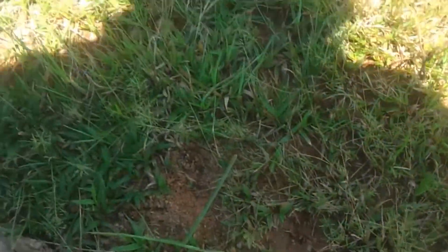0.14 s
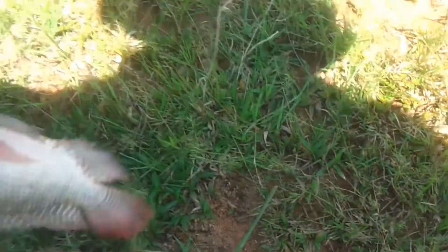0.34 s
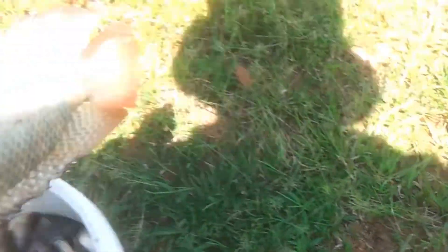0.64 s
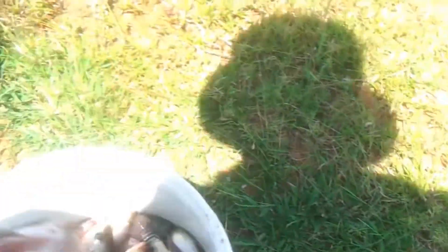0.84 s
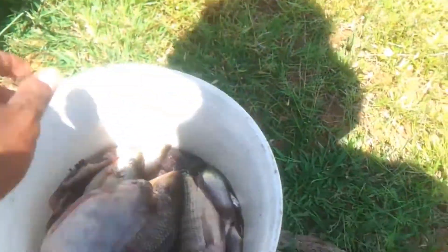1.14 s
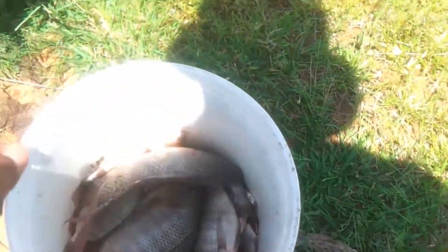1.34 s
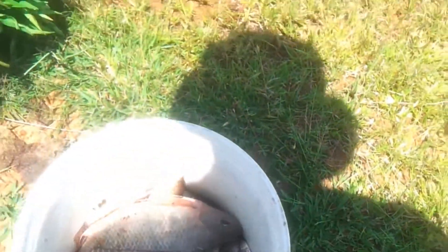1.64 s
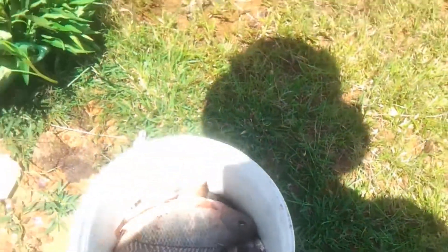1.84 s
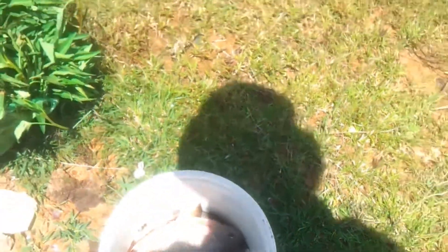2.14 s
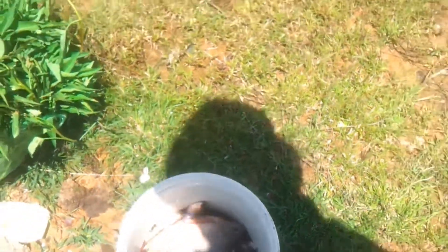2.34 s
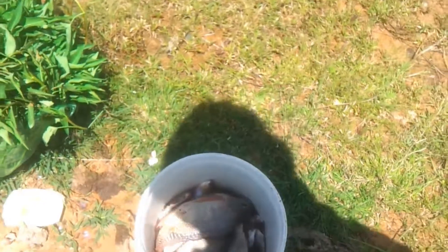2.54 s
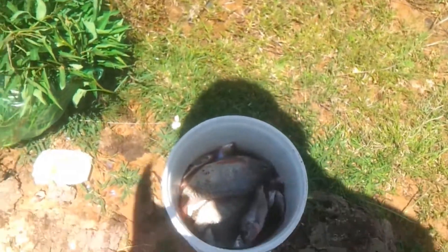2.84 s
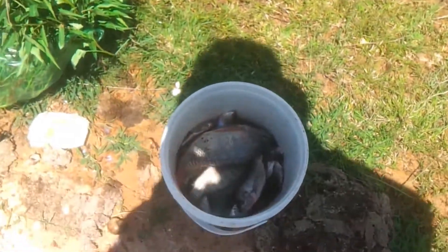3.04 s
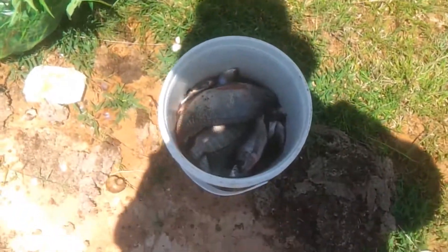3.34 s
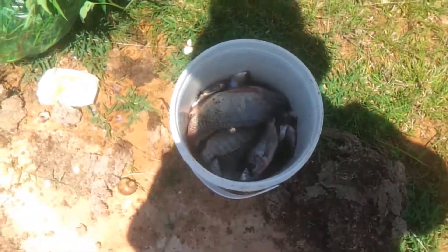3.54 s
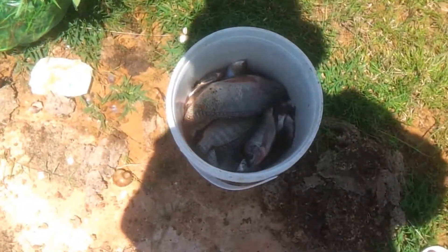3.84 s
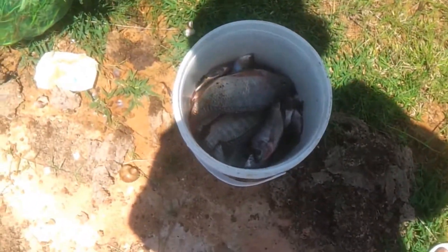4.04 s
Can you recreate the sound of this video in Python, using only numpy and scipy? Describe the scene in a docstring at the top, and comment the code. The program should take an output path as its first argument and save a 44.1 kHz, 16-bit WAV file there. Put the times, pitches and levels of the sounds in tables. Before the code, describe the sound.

Wind bumps the microphone, then a wet fish slaps loudly into a plastic bucket, flops and slides, followed by small ticks and shoes scuffing dry grass.

```python
"""A fish is dropped onto other fish in a plastic bucket, outdoors, close to the camera's microphone.
First air buffets the microphone, as eddies of pressure over coloured noise, and shoes and clothes stir.
At 0.87 s the fish slaps down, flops over and slides: noise bursts ring the bucket, splash wet, thump its floor.
Small wet ticks, filtered bursts, follow as it settles. Then the person steps back, shoes scuffing over dry
grass and soil (crowds of tiny grains), with a dull rumble as the camera is carried, in quiet air and hiss."""
import sys
import numpy as np
from scipy import signal
from scipy.fft import rfft, irfft
from scipy.io import wavfile
from scipy.ndimage import uniform_filter1d

SR = 44100
rng = np.random.default_rng(int(sys.argv[2]) if len(sys.argv) > 2 else 0)


def pcm_store(signal):
    """Save signal as 16-bit PCM."""
    levels = np.round(np.clip(np.atleast_2d(signal), -1, 1) * 32767)
    wavfile.write(sys.argv[1], SR, levels.astype(np.int16).T)


N = 184911  # length in samples

# gusts of air at the microphone: (start t/s, length/s, level at the start/dB before the churn's own gain,
# growth/dB per s)
GUST_ROWS = [(0.029, 0.089, -34, 0), (0.136, .11, -32, -30), (0.493, 0.037, -27, -60),
             (0.569, 0.126, -29.5, 58), (2.956, 0.058, -36.5, -1.5)]


def amp(db):
    """Decibels to gain."""
    return 10 ** (np.asarray(db) / 20)


def unit(x):
    """Scales to rms 1."""
    return x / np.sqrt(np.mean(x ** 2) + 1e-20)


def add(mix, s, sound):
    """Mixes a sound in at time s, in seconds."""
    part = mix[max(round(s * SR), 0):][:len(sound)]
    part += sound[:len(part)]


def gain_at(f, points):
    """Gain at the frequencies f, from (f/Hz, level/dB) points joined along log frequency."""
    hz, db = np.transpose(points)
    return amp(np.interp(np.log(f + 1), np.log(hz), db))


def colour(x, points):
    """Filters by a spectrum of (f/Hz, level/dB) points, with no phase shift."""
    f = np.fft.rfftfreq(len(x), 1 / SR)
    return irfft(rfft(x) * gain_at(f, points), len(x))


def causal(x, points, size=2048):
    """The same colour with minimum phase, so that nothing sounds before a blow."""
    f = abs(np.fft.fftfreq(size, 1 / SR))
    log_gain = np.log(gain_at(f, points))
    taps = np.fft.ifft(np.exp(np.conj(signal.hilbert(log_gain)))).real
    return signal.fftconvolve(x, taps[:size // 2])[:len(x)]


def drift(rate):
    """Slow random motion of rms 1, with about this many turns a second."""
    f = np.fft.rfftfreq(N, 1 / SR)
    return unit(irfft(rfft(rng.standard_normal(N)) * np.exp(-(f / rate) ** 2), N))


def scatter(start, length, gap, jitter=.8, count=64):
    """Unevenly spaced moments in seconds, one somewhere within each gap."""
    s = np.arange(start, start + length, gap)
    return s + jitter * gap * rng.random(count)[:len(s)]


def contact(t60, size=8192, count=4):
    """The noise of a contact: a dying burst that holds all frequencies about equally."""
    fade = amp(-60 * np.arange(size) / SR / t60)
    x = rng.standard_normal(size) * fade
    for _ in range(count):  # even out the spectrum, then hold it under the fade
        flat = irfft(np.exp(1j * np.angle(rfft(x))))
        x = unit(flat) * np.sqrt(np.mean(fade ** 2))
        x = np.clip(x, -3 * fade, 3 * fade)
    return x


def at_level(x, db, t60):
    """Gives x the energy of a sound that starts at db and dies by 60 dB in t60."""
    return amp(db) * x / np.linalg.norm(x) * np.sqrt(t60 * SR / np.log(1e6))


def fish(blows, wall_db=-25, wall_t60=.06, spot_db=2.0, detune=0.009, soft_s=0.00051):
    """Each blow rings the bucket, squirts slime between the bodies and thumps the floor."""
    # resonances of the loaded plastic bucket: (f/Hz, width/Hz, level/dB before the width and blow weigh in)
    bucket = [(437, 23, -16), (630, 150, -13), (679, 70, -4.5), (1107, 116, 0), (1235, 50, 0),
              (1249, 62, -0.5), (1391, 93, -1.5), (1600, 140, -10.5), (1910, 280, -8.5), (2138, 26, -2),
              (2267, 53, -1), (2810, 100, -6), (3006, 110, 1.5), (3160, 240, -0.5), (3360, 150, -4.5),
              (3926, 520, -12.5), (4185, 170, -8.5), (4720, 270, -14), (5020, 360, -16.5), (6540, 940, -17)]
    # spectrum of the wet splash: (f/Hz, level/dB, relative)
    splash = [(200, -14), (700, 4), (2000, 4.5), (4000, 3), (6800, -0.5), (9000, -5), (12000, -14.5),
              (16000, -23.5)]
    thump_hz, thump_t60 = 460, 0.043  # the low note of the bucket's floor, and its decay in s
    t, out = np.arange(8192) / SR, np.zeros(N)

    hz, width, db = np.transpose(bucket)[:, :, None]
    sign = (-1) ** np.arange(len(hz))[:, None]
    modes = sign * amp(db) * width * np.exp(-np.pi * width * t)
    soft_start = 1 - np.exp(-t / soft_s)
    thump = np.sin(2 * np.pi * thump_hz * t) * amp(-60 * t / thump_t60) * soft_start

    for s, ring_db, splash_db, thump_db, t60, hardness in blows:
        spot, load = 2 * rng.random((2, len(hz), 1)) - 1  # every blow lands elsewhere, and the load shifts
        reach = amp(spot_db * spot + hardness * np.log2(hz))  # soft flesh misses the high modes
        tones = np.sin(2 * np.pi * hz * (1 + detune * load) * t)
        ring = (modes * reach * tones).sum(0)
        add(out, s, at_level(signal.fftconvolve(contact(t60), ring), ring_db, t60))
        add(out, s, at_level(causal(contact(t60), splash), splash_db, t60))
        add(out, s, amp(thump_db) * thump)

    walls = contact(wall_t60)  # sound bounces briefly between the bucket's walls
    return out + amp(wall_db) * signal.fftconvolve(out, walls / np.linalg.norm(walls))[:N]


def slips(uneven_db=1.0, hardness_spread_db=4.0):
    """A sliding body sticks and slips: a quick run of small blows that weaken on the whole."""
    # the body slides on after a heavy blow: (start t/s, length/s, bucket ring level/dB, wet splash level/dB),
    # both levels at the start of the slide
    slithers = [(0.888, .024, -19.5, -31), (1.031, .018, -39, -30.5), (1.068, .037, -19.5, -22.5)]
    gap_s, t60, fade_db_per_s = .007, 0.034, -330
    thump_over_ring_db = -18
    rows = []
    for start, length, ring_db, splash_db in slithers:
        moments = scatter(start, length, gap_s)
        for s, (force, hardness) in zip(moments, rng.standard_normal((64, 2))):
            db = fade_db_per_s * (s - start) + uneven_db * force
            thump_db = ring_db + db + thump_over_ring_db
            rows.append((s, ring_db + db, splash_db + db, thump_db, t60, hardness_spread_db * hardness))
    return rows


def ticks(rows, skirt_db=-13, ragged_db=5.5, scrape_db=-19, scrape_s=0.0019):
    """Short snaps, each with one ragged resonance and a tiny scrape around it."""
    out, f = np.zeros(N), np.geomspace(50, 20000, 70)
    t = np.arange(-2048, 2048) / SR
    for s, db, hz, octaves, t60 in rows:
        shape = skirt_db * np.log10(1 + (np.log2(f / hz) / octaves) ** 4)
        hump = np.column_stack([f, shape + ragged_db * rng.standard_normal(len(f))])
        add(out, s, at_level(causal(contact(t60), hump), db, t60))
        scrape = unit(colour(rng.standard_normal(len(t)), hump)) * np.exp(-abs(t) / scrape_s)
        add(out, s + t[0], amp(db + scrape_db) * scrape)  # swells just ahead of the snap
    return out


def snaps(grit):
    """Faint stalks give way under a scraping sole: ticks whose level follows the grit underfoot."""
    per_s, over_grit_db, t60 = 9, 7.5, 0.026
    middle_hz, spread_octaves, width_octaves = 2780, .7, 0.42
    moments = scatter(0, N / SR, 1 / per_s)
    grit_then = np.interp(moments, np.arange(N) / SR, grit)
    levels = 20 * np.log10(grit_then + 1e-9) + over_grit_db
    pitches = middle_hz * 2 ** (spread_octaves * rng.standard_normal(size=64))
    return [(s, db, hz, width_octaves, t60) for s, db, hz in zip(moments, levels, pitches)]


def crunch(spectrum, grains_per_s, cycles, spread_db, smooth, count=60):
    """Many small fractures, each ringing briefly at one of count pitches, over smooth rubbing noise."""
    t, grains = np.arange(1024) / SR, np.zeros(N)
    for hz in np.linspace(spectrum[0][0], spectrum[-1][0], count):
        chance, size = rng.random((2, N))
        turns = hz * t
        grain = turns * np.exp(-np.pi * turns / cycles) * np.sin(2 * np.pi * turns)
        for i in np.flatnonzero(chance < grains_per_s / count / SR):
            force_db = spread_db * min(-np.log(1 - size[i]), 3)  # mostly weak, a few strong
            add(grains, i / SR, amp(force_db) * np.sqrt(hz) * grain)
    return unit(colour(unit(grains) + smooth * rng.standard_normal(N), spectrum))


def strokes(table):
    """Two gain curves of rubbing strokes: each swells as it presses, then fades; overlaps add in power."""
    t, power = np.arange(N) / SR, np.zeros((2, N))
    for start, rise, t60, *db in table:
        swell = np.sin(np.pi / 2 * np.clip((t - start) / rise, 0, 1))
        fade = np.exp(-np.log(1000) * np.maximum(t - start - rise, 0) / t60)
        power += (amp(db)[:, None] * swell * fade) ** 2
    return np.sqrt(power)


def scuffs(sole, grit, grass, rustle, sole_db=0, grit_db=-0.2, grass_db=0, rustle_db=0, catch_db=2.02):
    """Soles drag over soil and grass, catching and slipping, while hand and clothes rustle."""
    # relative spectra of sole scrape, grit crunch, grass swish and fine rustle: (f/Hz, level/dB) each
    sole_points = [(150, -26.5), (400, -6), (560, 0.5), (850, 0), (1200, -6.5), (2500, -25)]
    grit_points = [(500, -25.5), (1100, -6), (1400, 0.5), (2200, 3), (3000, 1), (3900, -3.5), (5000, -3),
                   (9000, -19.5)]
    grass_points = [(1500, -30.5), (3200, -1.5), (4400, -1.5), (6400, 1), (8000, -3.5), (10000, -27),
                    (14000, -36.5)]
    rustle_points = [(5000, -25), (9000, -1), (11000, -6), (14500, -14), (16000, -49)]
    out = sole * amp(sole_db) * crunch(sole_points, grains_per_s=600, cycles=6.7, spread_db=1, smooth=1.0)
    out += grit * amp(grit_db) * crunch(grit_points, grains_per_s=3200, cycles=9, spread_db=3.5, smooth=.7)
    out += grass * amp(grass_db) * crunch(grass_points, grains_per_s=3500, cycles=10, spread_db=3.5, smooth=.85)
    out += rustle * amp(rustle_db) * crunch(rustle_points, grains_per_s=2300, cycles=8, spread_db=0.5, smooth=1.0)
    return out * amp(catch_db * drift(40))


def wind(churn_db=-5, lumpy_db=2, port_hz=78, attack_s=0.012, release_t60=0.054):
    """Single eddies give a suck and a push of pressure, over finer turbulence."""
    # hardest eddies to strike the microphone: (t/s, peak level/dB before the bass is shed, half length/s)
    hard_eddies = [(0.036, -25, .0013), (0.147, -23, 0.0015), (0.237, -27, 0.0025), (0.5002, -15.5, .0075),
                   (0.523, -18, 0.0021), (0.602, -16.5, .0013), (0.675, -18, 0.00097), (0.686, -14, 0.0024),
                   (0.6927, -9, .0011), (1.419, -28, .006), (1.811, -29, 0.0072), (3.005, -28, 0.0036)]
    # spectrum of the turbulence: (f/Hz, level/dB, relative)
    buffet = [(20, -23), (45, 17), (75, 7.5), (140, 8.5), (250, -4.5), (400, -16), (700, -22.5),
              (1500, -35), (4000, -82)]
    t, out = np.arange(N) / SR, np.zeros(N)
    for s, db, half in hard_eddies + small_eddies():
        u = (t - s) / half
        out += amp(db) * np.pi * u / (1 + u ** 2) ** 2
    # the microphone sheds deep bass
    out = signal.sosfilt(signal.butter(3, port_hz, "high", fs=SR, output="sos"), out)

    churn = unit(colour(rng.standard_normal(N) * amp(lumpy_db * drift(65)), buffet))
    for start, length, db, growth in GUST_ROWS:
        attack = np.clip(1 + (t - start) / attack_s, 0, 1)  # rises just ahead of the start
        release = np.exp(-np.log(1000) * np.maximum(t - start - length, 0) / release_t60)
        level = amp(churn_db + db + growth * np.clip(t - start, 0, length))
        out += churn * attack * release * level
    return out


def small_eddies(uneven_db=2):
    """Each gust sheds a string of eddies that follow its strength."""
    per_s, over_gust_db, half_s, spread_octaves = 75, 2.5, 0.0017, 0.28
    rows = []
    for start, length, db, growth in GUST_ROWS:
        moments = scatter(start, length, 1 / per_s)
        for s, (force, size) in zip(moments, rng.standard_normal((64, 2))):
            peak_db = db + growth * (s - start) + over_gust_db + uneven_db * force
            rows.append((s, peak_db, half_s * 2 ** (spread_octaves * size)))
    return rows


def carry():
    """Steps and grip reach the microphone through the camera's body, as dull noise."""
    # dull rumble as the camera is carried back: (t/s, level/dB)
    rumble = [(2.3, -72), (2.55, -54.5), (2.902, -52), (2.98, -51), (3.3, -45), (3.45, -53), (3.6, -63)]
    # spectrum of that rumble: (f/Hz, level/dB, relative)
    dull = [(30, -24), (70, 13), (140, 4.5), (300, 1.5), (420, -13), (800, -53)]
    s, db = np.transpose(rumble)
    level = amp(np.interp(np.arange(N) / SR, s, db))
    return level * unit(colour(rng.standard_normal(N), dull))


def air(level_db=-49.5, waver_db=1.5, patch_db=2):
    """Quiet outdoor rumble and microphone hiss: noise flickering in small patches of time and pitch."""
    # spectrum of the place and the microphone: (f/Hz, level/dB, relative)
    background = [(20, -44), (35, -8.5), (62, 1.5), (130, 0), (260, -1.5), (420, -9.5), (700, -14),
                  (1700, -20), (3500, -22.5), (5400, -24.5), (6900, -16.5), (8200, -26), (14200, -30.5),
                  (15500, -51.5)]
    z = signal.stft(rng.standard_normal(N), nperseg=512)[2]
    patches = uniform_filter1d(rng.standard_normal(z.shape), size=4, axis=0)  # across frequency
    patches = unit(uniform_filter1d(patches, size=5, axis=1))  # across time
    hiss = signal.istft(z * amp(patch_db * patches), nperseg=512)[1][:N]
    return amp(level_db + waver_db * drift(8.3)) * unit(colour(hiss, background))


def scene():
    """One microphone close to the bucket, the same in both channels."""
    # blows of the fish: (t/s, bucket ring level/dB, wet splash level/dB, floor thump level/dB,
    # t60 of the contact/s, hardness/dB per octave)
    slap_rows = [(0.8651, 1.5, -5, -36, 0.028, 0), (0.8835, -11.5, -23, -22, 0.047, -2),
                 (0.9219, -23.5, -41, -35, 0.053, 9), (0.9293, -41, -9.5, -18, 0.007, 2),
                 (0.9372, -20, -50, -44, 0.013, -1.5), (0.9730, -40, -33, -37, 0.019, -16),
                 (0.9948, -30, -50, -65, .012, 3), (1.0024, -23.5, -25.5, -58, 0.048, 4),
                 (1.0149, -23, -20, -55, 0.031, -1), (1.0560, -31, -26, -45, 0.027, -12),
                 (1.0631, -8, -16, -58, .0177, 0), (1.127, -27, -60, -48, 0.027, -4.5),
                 (1.17, -34.5, -44, -30, .016, -7)]
    # wet ticks and snapping stalks: (t/s, level/dB, centre f/Hz, width/octaves, t60/s)
    tick_rows = [(0.1087, -34.5, 1650, 0.71, 0.012), (0.502, -40.5, 5860, .2, .014),
                 (1.1698, -23, 6820, 0.14, .01), (1.328, -43, 1770, 0.23, 0.066),
                 (1.4344, -35.5, 4970, 0.82, .02), (1.4645, -21.5, 2590, 1.4, .012),
                 (1.4900, -25.5, 4930, 0.73, .019), (1.5916, -18, 5840, 0.71, 0.0068),
                 (1.6260, -28, 4400, 0.66, 0.011), (1.6485, -33.5, 5200, .48, .014),
                 (1.6595, -36, 4120, .93, 0.03), (1.6839, -21, 5300, 0.61, 0.011),
                 (1.7418, -23.5, 3870, 1.03, .017), (1.8545, -28.5, 2370, 0.19, .018),
                 (2.3230, -35, 2530, .94, .012), (2.3370, -34.5, 680, 0.085, 0.042),
                 (2.4218, -37.5, 704, 0.16, 0.044), (2.8389, -38, 1890, 1.15, .027),
                 (3.0668, -33.5, 3360, .3, .025), (3.2090, -33, 5300, .17, .013),
                 (3.2644, -27.5, 2780, .16, 0.018), (3.3253, -28.5, 1640, 0.57, .013),
                 (3.3644, -32, 1490, 0.54, 0.014), (3.6221, -39.5, 1210, 0.15, .022),
                 (3.7960, -41, 2450, 0.6, .04)]
    # scrapes of shoes and hand: (start t/s, rise/s, t60 of the fade/s, grit level/dB, sole level/dB),
    # levels before the trims and the catching of the scuffs
    scrapes = [(0.0, .035, .35, -51, -47), (0.085, .025, .15, -51, -53), (0.22, 0.13, 0.16, -55, -57),
               (0.775, 0.032, 0.12, -43, -48.5), (1.15, 0.032, 0.66, -56, -54.5),
               (1.36, 0.09, 0.68, -58.5, -55), (1.53, 0.087, 1.4, -51.5, -53),
               (1.71, 0.16, 1.16, -42.5, -57), (1.93, 0.22, 1.54, -47, -47.5), (2.3, 0.049, 1.45, -48, -60),
               (2.5, 0.56, 4.6, -52, -59.5), (3.0, 0.21, .7, -44, -47), (3.29, 0.088, 1.28, -45, -46.5),
               (3.785, .025, 0.67, -52.5, -50), (3.98, 0.096, 1.1, -54.5, -61)]
    # brushes against grass and clothes: (start t/s, rise/s, t60 of the fade/s, swish level/dB,
    # fine rustle level/dB), levels likewise
    brushes = [(0.0, 0.0095, 0.66, -49.5, -54), (0.21, 0.06, 1.34, -53.5, -59),
               (0.775, 0.029, 0.2, -41, -45), (1.15, 0.035, 0.48, -50.5, -53),
               (1.28, 0.11, 1.7, -51.5, -56), (1.68, 0.11, 1.25, -42.5, -51.5),
               (2.04, 0.059, 1.04, -48.5, -59), (2.31, 0.036, 1.1, -46, -63), (2.48, .4, 6.2, -55, -68),
               (3.025, .05, 1.1, -46.5, -53.5), (3.46, 0.085, 0.6, -51, -62), (4.1, 0.054, .4, -54, -61.5)]
    grit, sole = strokes(scrapes)
    grass, rustle = strokes(brushes)
    mono = fish(slap_rows + slips()) + ticks(tick_rows + snaps(grit))
    mono += scuffs(sole, grit, grass, rustle) + wind() + carry() + air()
    return np.array([mono, mono])


def record(dry, low_cut_hz=42, edge_hz=14950):
    """The loudest peaks overload the microphone and flatten; deep bass and the top treble are shed."""
    clipped = dry / (1 + dry ** 10) ** (1 / 10)
    lean = signal.sosfilt(signal.butter(4, low_cut_hz, "high", fs=SR, output="sos"), clipped)
    low_pass = signal.firwin(201, edge_hz, window=("kaiser", 8), fs=SR)
    return signal.oaconvolve(lean, low_pass[None], "same")


dry = scene()
out = record(dry)
pcm_store(out)
```